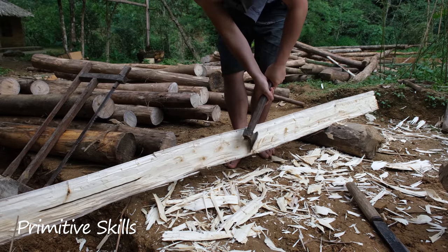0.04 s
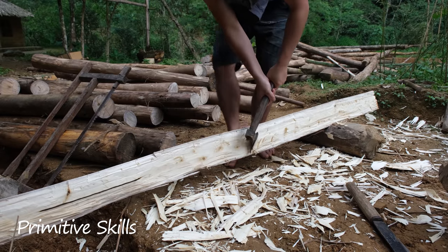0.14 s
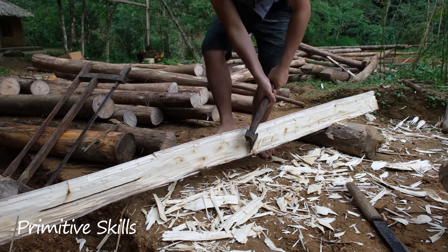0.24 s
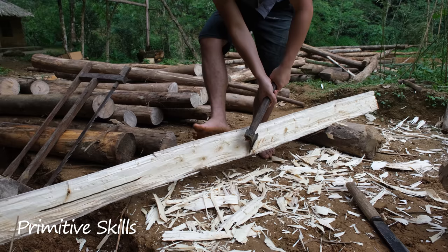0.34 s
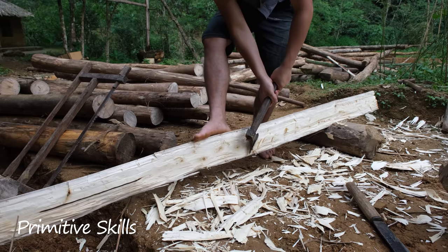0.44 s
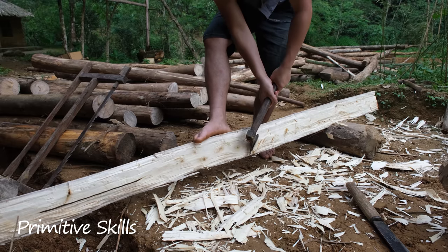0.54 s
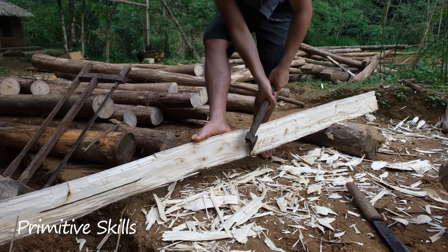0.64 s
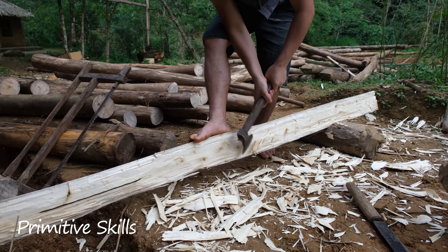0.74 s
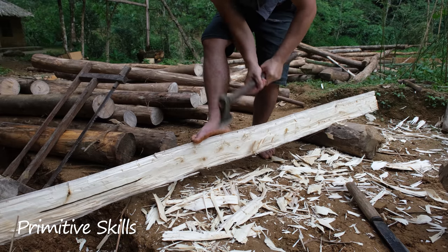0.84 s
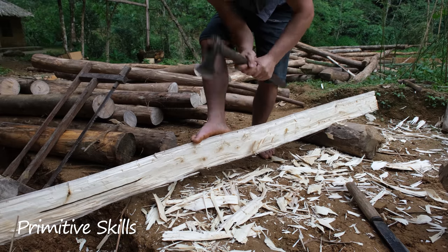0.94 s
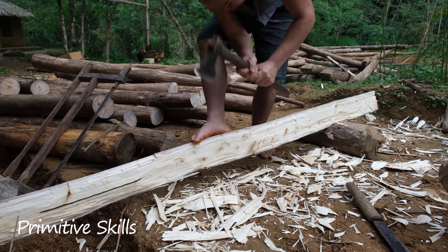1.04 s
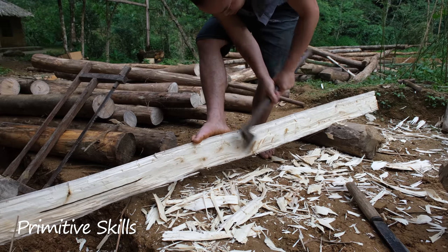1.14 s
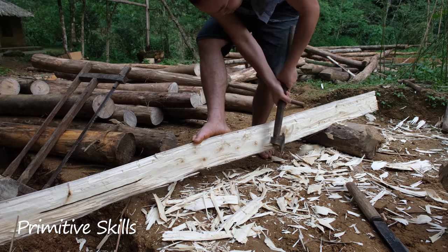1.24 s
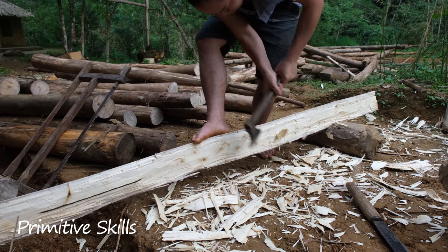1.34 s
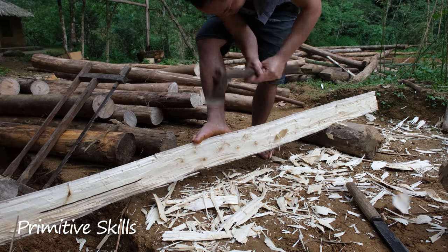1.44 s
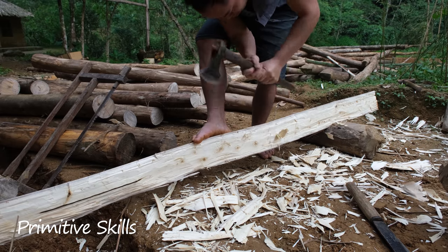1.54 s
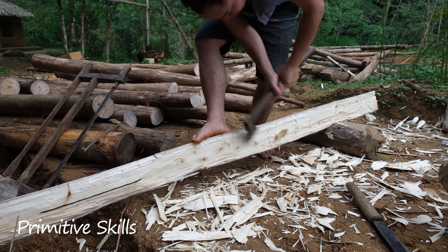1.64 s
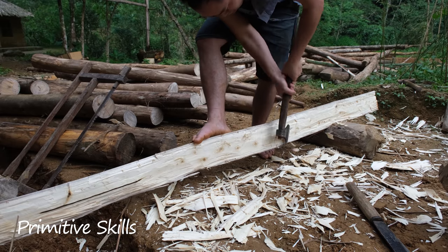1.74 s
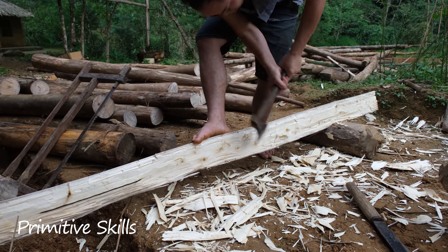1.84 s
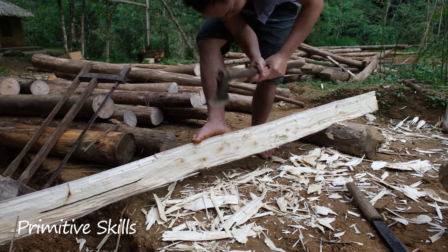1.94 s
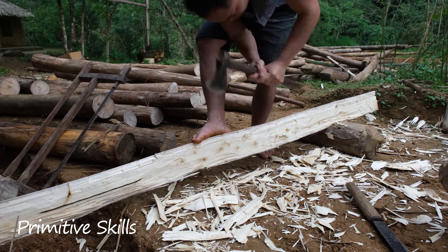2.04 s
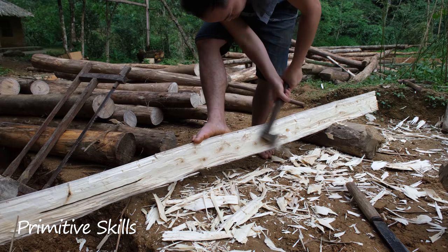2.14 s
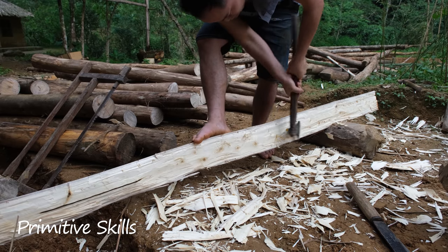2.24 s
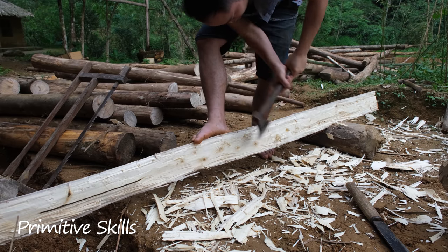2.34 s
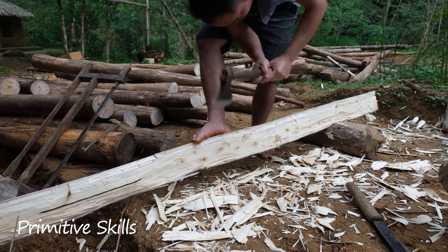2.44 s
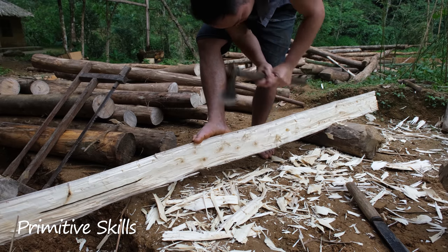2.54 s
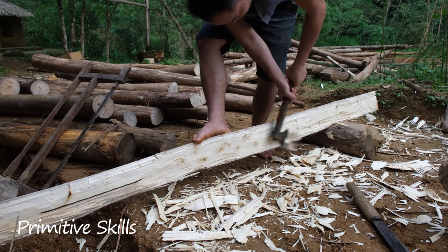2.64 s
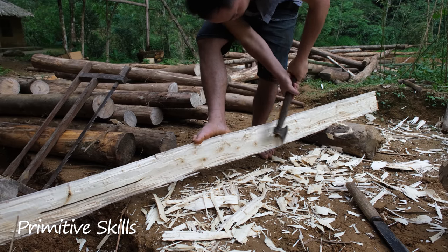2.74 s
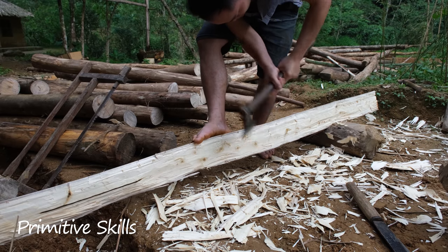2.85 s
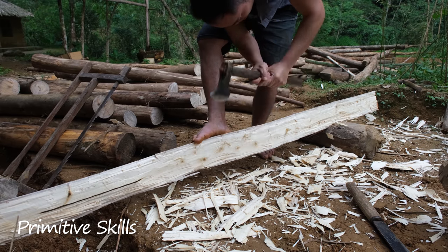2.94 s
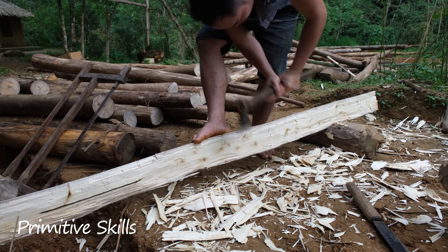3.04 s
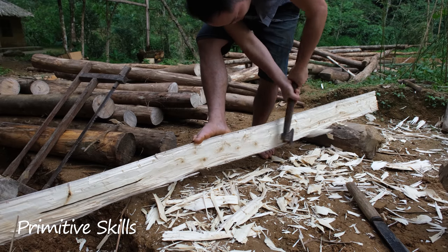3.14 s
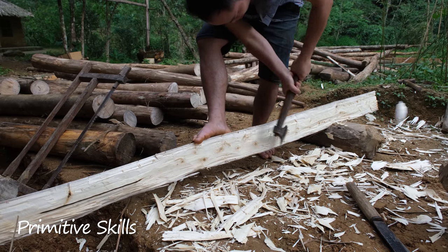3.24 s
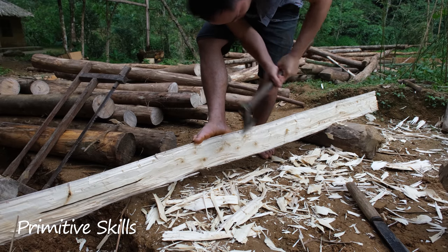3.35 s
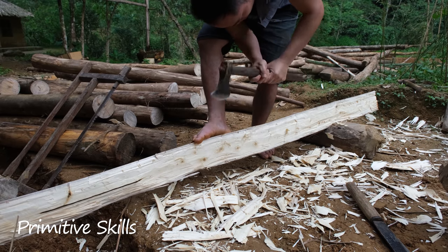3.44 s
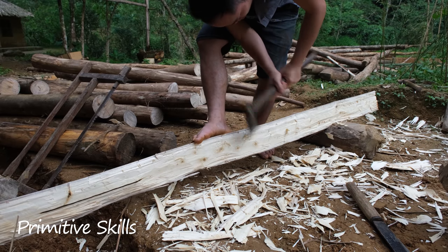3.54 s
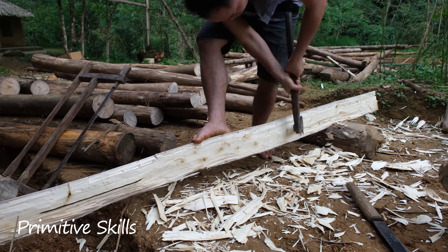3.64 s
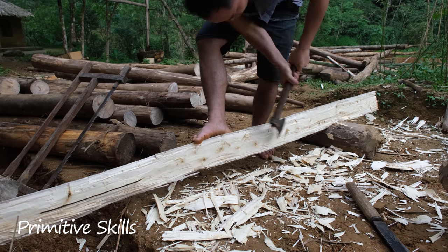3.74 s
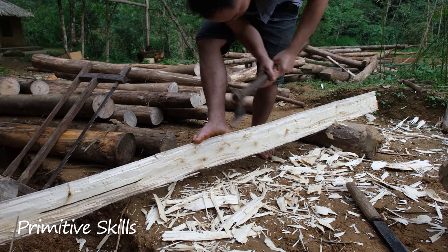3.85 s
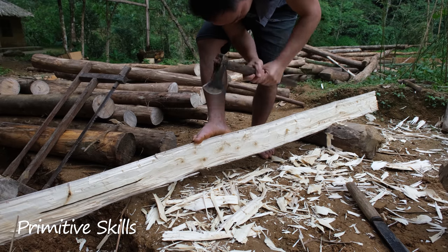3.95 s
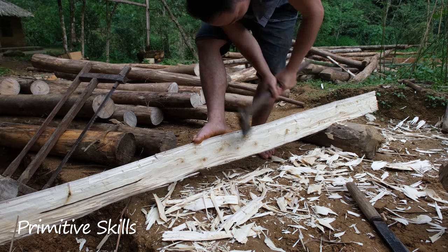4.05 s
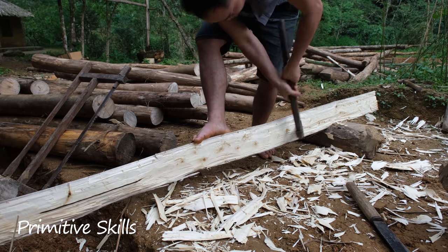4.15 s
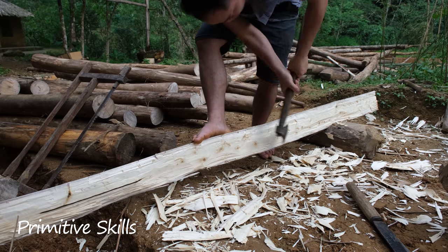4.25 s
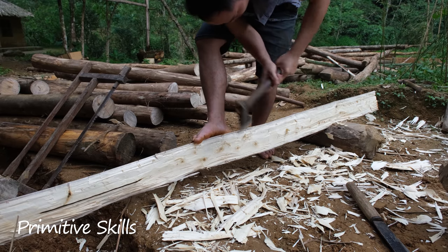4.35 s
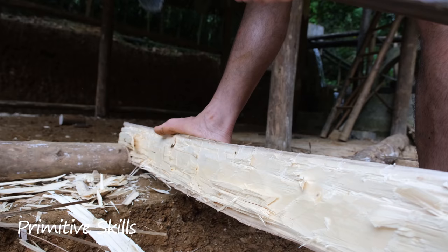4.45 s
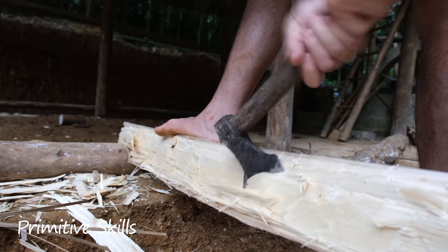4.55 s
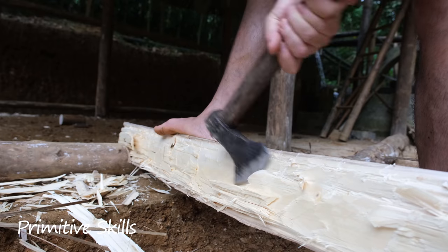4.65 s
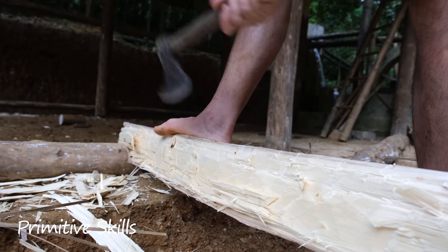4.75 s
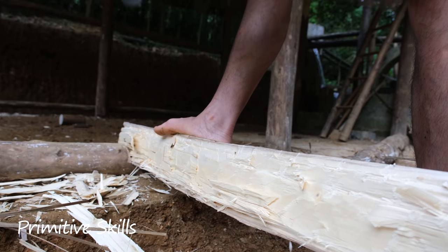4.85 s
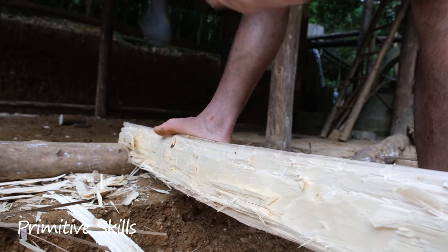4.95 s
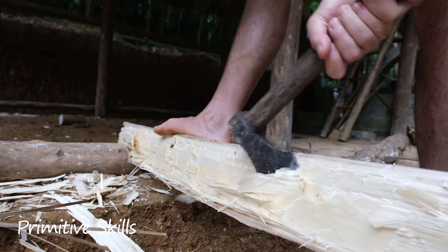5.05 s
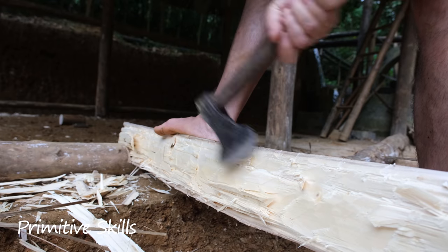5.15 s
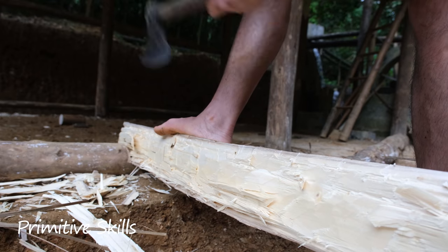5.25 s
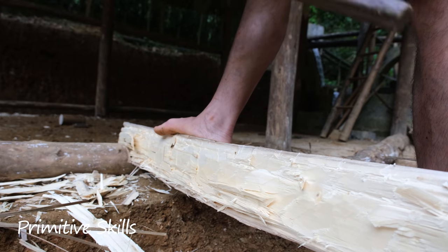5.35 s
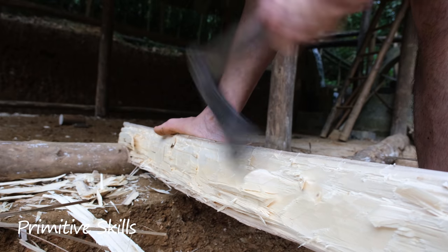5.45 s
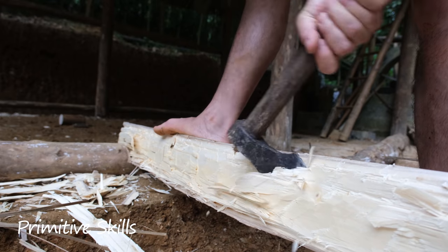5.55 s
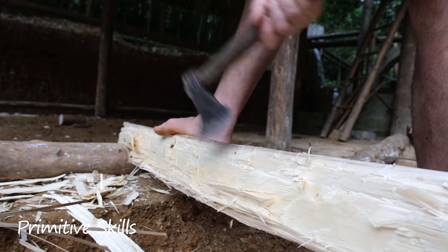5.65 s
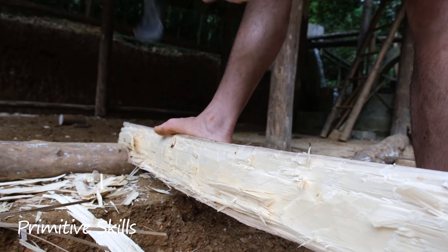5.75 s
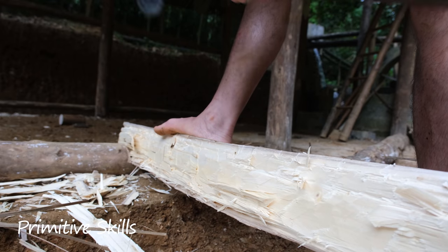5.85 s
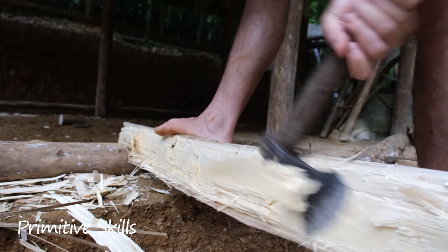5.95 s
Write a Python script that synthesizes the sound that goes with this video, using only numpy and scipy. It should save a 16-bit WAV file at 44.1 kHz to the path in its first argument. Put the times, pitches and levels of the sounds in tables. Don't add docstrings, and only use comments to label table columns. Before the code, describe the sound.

Steady axe work outdoors, nearly dry with a short dull scatter of echoes. Each blow is a brief hard crack, a short log ring and crackling fibres, about half a second apart. Water hiss swells back between strokes, with faint ground rumble and one distant bird peep. After seven blows the perspective cuts close: four harsher, distorted, splintery bites.

```python
import sys
import numpy as np
from scipy import signal
from scipy.io import wavfile

SR = 44100
rng = np.random.default_rng(int(sys.argv[2]) if len(sys.argv) > 2 else 0)


def bounce(signal):
    frames = np.transpose(np.atleast_2d(signal))
    limited = np.clip(frames, -1, 1)
    pcm = np.round(limited * 32767).astype(np.int16)
    wavfile.write(sys.argv[1], SR, pcm)


def voltage_ratio(decibels):
    exponent = np.asarray(decibels, float) / 20
    return 10 ** exponent


N = 265041
SCENE_CHANGE_S = 4.515


def at_hz(points, hz):
    points = np.array(points)
    return np.interp(np.log(hz), np.log(points[:, 0]), points[:, 1])


def band(x, low_hz, high_hz):
    return signal.sosfilt(signal.butter(2, [low_hz, min(high_hz, .45 * SR)], "band", fs=SR, output="sos"), x)


def drift(rate_hz):
    r = np.exp(-80 * np.pi * rate_hz / SR)
    slow = signal.lfilter([1], [1, -2 * r, r * r], rng.standard_normal(N // 40 + 2002))[2000:]
    return np.interp(np.arange(N) / 40, np.arange(len(slow)), slow / slow.std())


def ring(clicks, hz, t60):
    r = voltage_ratio(-60 / (t60 * SR))
    w = 2 * np.pi * hz / SR
    return signal.lfilter([0, np.sin(w)], [1, -2 * r * np.cos(w), r * r], clicks + 1e-18)


def clicks_at(seconds, heights):
    out = np.zeros(N)
    places = np.round(np.asarray(seconds) * SR).astype(int)
    np.add.at(out, np.clip(places, 0, N - 1), heights)
    return out


def contact(s, length_s, release_t60):
    start = round(s * SR)
    t = np.arange(min(round(.25 * SR), N - start)) / SR
    shape = np.minimum(t / 0.00055, 1) * voltage_ratio(-60 * np.maximum(t - length_s, 0) / release_t60)
    return slice(start, start + len(t)), t, shape


def swells(rows, width_s):
    s, level_db = np.transpose(rows)[:, :, None]
    t = np.arange(N) / SR
    return np.sum(voltage_ratio(level_db) * np.exp(-.5 * ((t - s) / width_s) ** 2), axis=0)


# f/Hz, level/dB per Hz
WATER_FAR_SPECTRUM = [(47, -31), (80, -34), (152, -4), (203, -12.5), (276, -5.5), (377, -18), (421, -5.5),
                      (574, -6), (613, -13), (685, -4.5), (873, 1), (1190, -8.5), (4110, -15.5),
                      (15900, -44.5)]
WATER_NEAR_SPECTRUM = [(53, -47), (90, -24), (158, 3), (244, -11), (427, 1.5), (456, -10.5), (566, -1),
                       (750, -6), (873, -0.5), (1380, -7.5), (3410, -11), (15900, -36.5)]


def water(spectrum, patchy_db):
    edges = 40 * 2 ** np.arange(0, 8.9, 1 / 3)
    white = rng.standard_normal((2, N))
    out = 0
    for k, (low, high) in enumerate(zip(edges, edges[1:])):
        gain = voltage_ratio(at_hz(spectrum, np.sqrt(low * high)) + patchy_db * drift(4.3))
        out = out + gain * band(white[k % 2], low, high)
    return out / out.std()


def water_hiss():
    near = np.arange(N) / SR >= SCENE_CHANGE_S
    far_water = water(WATER_FAR_SPECTRUM, patchy_db=.8)
    near_water = water(WATER_NEAR_SPECTRUM, patchy_db=.6)
    between = swells([(b[0] + 0.24, 0) for b in BLOWS], width_s=0.12)
    level_db = np.where(near, -39.5, -44.5) + 2 * between
    return voltage_ratio(level_db) * np.where(near, near_water, far_water)


# f/Hz, level/dB, t60/s
STAND_MODES = [(66.9, -28, 0.59), (25, -22, 0.34)]
# t/s, level/dB
STEPS_UNDERFOOT = [(0.0, -71), (.58, -74), (1.35, -72), (1.92, -65), (2.22, -63), (2.75, -62), (3.15, -66),
                   (3.95, -81)]


def shake():
    rumble = band(band(rng.standard_normal(N), 29.5, 83), 23, 104)
    jolts = clicks_at([b[0] + 0.0086 for b in BLOWS if b[0] > SCENE_CHANGE_S], 0.92)
    stand = sum(voltage_ratio(level_db) * ring(jolts, hz, t60) for hz, level_db, t60 in STAND_MODES)
    steady = voltage_ratio(np.where(np.arange(N) < SCENE_CHANGE_S * SR, -73, -58))
    return (steady + swells(STEPS_UNDERFOOT, width_s=0.088)) * rumble / rumble.std() + stand


# f/Hz, level/dB, t60/s
LOG_MODES_FAR = [(220.5, -20, 0.33), (388.5, -11, 0.25), (480.7, 5, 0.22), (622, 4.5, 0.15),
                 (828.5, 16.5, 0.035), (1110, -10, 0.23), (1240, -29, 0.4)]
LOG_MODES_NEAR = [(346, 5.5, 0.13), (471, 7, 0.14), (606, -5, 0.057), (804, -18, 0.044), (830, -5, 0.092),
                  (1100, -31, 0.057), (1280, 3, 0.052), (1650, -67, 0.05), (1960, -11, 0.018)]
# t/s, ring level/dB, favoured f/Hz, dry thud level/dB
SOFT_KNOCKS = [(0.0, -37, 450, -36), (.528, -40.5, 505, -43), (.54, -43, 490, -43), (1.228, -11.5, 680, 3),
               (1.391, -45, 1160, -19.5), (1.4, -49, 980, -33), (1.693, -39, 920, -15.5),
               (2.218, -6, 546, 2.5), (2.664, -48, 900, -37), (3.611, -37, 1110, -14), (3.638, -9, 494, 2),
               (3.644, -7.5, 750, 2.5), (3.653, -19, 494, 11), (3.662, -12, 795, 8.5),
               (3.673, -9.5, 704, 9), (3.678, -37, 805, -26), (3.69, -30, 706, -20),
               (4.145, -21.5, 452, -11), (4.155, -52, 450, 4), (4.169, -23, 606, -0.5),
               (4.494, -42, 880, -28), (5.082, -37, 900, -18)]


def log():
    seconds = np.array([b[0] + b[3] / 2 for b in BLOWS] + [k[0] for k in SOFT_KNOCKS])
    levels_db = np.array([b[0] for b in LANDING_SPOTS] + [k[1] for k in SOFT_KNOCKS])
    _, below_db, above_db, *_ = np.transpose(LANDING_SPOTS)
    knock_hz = np.array(SOFT_KNOCKS)[:, 2]
    far = (LOG_MODES_FAR, 480, seconds < SCENE_CHANGE_S)      # modes, main ring in Hz, which strikes
    near = (LOG_MODES_NEAR, 842, seconds > SCENE_CHANGE_S)
    out = np.zeros(N)
    for modes, main_hz, heard in (far, near):
        spread = rng.standard_normal((len(seconds), len(modes), 2))
        for k, (hz, level_db, t60) in enumerate(modes):
            landing_db = below_db * (hz < .9 * main_hz) + above_db * (hz > 1.1 * main_hz)
            favour_db = np.r_[landing_db, -55 * np.log2(hz / knock_hz) ** 2]
            chance_db = 1.5 * spread[:, k, 0]
            strike = voltage_ratio(levels_db + level_db + favour_db + chance_db) * np.sign(spread[:, k, 1])
            out += ring(clicks_at(seconds, heard * strike), hz, t60)
    return band(out, 144, 2350)


def thuds():
    out, noise = np.zeros(N), rng.standard_normal(N)
    for s, _, hz, thud_db in SOFT_KNOCKS:
        span, t, shape = contact(s, 0.0035, release_t60=0.048)
        out[span] += voltage_ratio(thud_db) * band(shape * noise[span], hz / 1.73, hz * 1.42)
    return out


# t/s, level/dB
SWING_RUSTLES = [
    (.52, -52),
    (1.1, -58),
    (1.5, -53.5),
    (1.95, -53),
    (3.0, -51),
    (3.4, -57),
    (4.0, -72),
    (4.8, -69),
    (5.35, -45.5),
    (5.9, -44),
]


def rustle():
    t, white = np.arange(N) / SR, rng.standard_normal((2, N))
    leaves = band(white[0], 1400, 4750)
    insects = band(white[1], 6250, 6800)
    chorus = np.clip((t - 3.1) / .35, 0, 1) * (t < SCENE_CHANGE_S)
    leaf_gain = swells(SWING_RUSTLES, width_s=0.12) * voltage_ratio(1.5 * drift(27))
    insect_gain = voltage_ratio(-79) + voltage_ratio(-70) * chorus
    return leaf_gain * leaves / leaves.std() + insect_gain * insects / insects.std()


# t/s, level/dB, centre f/Hz
CHIP_TICKS = [(1.2065, -15, 2490), (1.222, -21, 5000), (1.232, -12.5, 2980), (1.243, -29, 4940),
              (1.255, -29, 6290), (1.393, -37, 2500), (1.447, -50, 7000), (1.531, -48.5, 8000),
              (1.733, -15, 3200), (1.738, -26, 5000), (1.744, -11, 3570), (1.744, -27, 10000),
              (1.762, -40, 8000), (2.205, -18, 5940), (2.228, -25, 3500), (2.775, -45, 8000),
              (3.351, -52, 4960), (3.613, -36, 2000), (3.644, -9.5, 2860), (3.663, -20, 2930),
              (3.673, -28, 2920), (3.703, -37, 5000), (4.173, -33, 3970), (4.193, -35, 3950),
              (4.312, -50, 5090), (5.106, -26.5, 4940), (5.63, -45, 10000), (5.695, -35, 4500)]


def chips():
    out, noise = np.zeros(N), rng.standard_normal(N)
    for s, level_db, hz in CHIP_TICKS:
        span, t, shape = contact(s, 0.00056, release_t60=0.023)
        snap = shape * noise[span]
        puff = band(snap, hz / 2.0, hz * 1.36)
        out[span] += voltage_ratio(level_db + 8.0) * (puff + voltage_ratio(-38.5) * ring(snap, hz, t60=0.0062))
    return out


# t/s, bite level/dB, bite f/Hz, bite length/s, tearing level/dB
BLOWS = [(1.2080, 13, 612, 0.00312, -4), (1.7061, 13, 603, 0.0041, 0.5), (2.1875, 16, 670, 0.0066, 0),
         (2.673, 4.5, 707, 0.0084, 3), (3.1407, 7.5, 776, 0.0073, -1), (3.6242, 8.5, 703, 0.0038, -3.5),
         (4.1228, 11.5, 620, 0.0066, -5), (4.5876, 19.5, 885, 0.00585, 0),
         (5.0492, 22, 890.4, 0.0073, 10.5), (5.5125, 18.5, 875.6, 0.0051, 12),
         (5.9793, 19.5, 870, 0.0074, 11)]
# main ring level/dB, modes below it level/dB, modes above it level/dB, overtone level/dB, shove level/dB
LANDING_SPOTS = [(-6, -14, -11.5, -1, -18), (-13.5, -2, -2.5, -9.5, -24), (-11, 1, -3, 0, -13),
                 (-17, -2, 6.5, -12, -19), (-15.5, -1, -6.5, -13.5, -28), (-13.5, 10.5, 0, -10.5, -39),
                 (-15, 1, 1, -3, -26), (-18, 0.5, 6, -28, -30), (-12, -4, 5, -11.5, -5.5),
                 (-12, -3.5, 2, -7, -7.5), (-5, -8, 10.5, -5.5, -18)]


def bites(wobble, glide, grind_db):
    out, push = np.zeros(N), np.zeros(N)
    unsteady = band(rng.standard_normal(N), 165, 1180)
    grind = band(rng.standard_normal(N), 625, 1710)
    for (s, bite_db, hz, length_s, _), (*_, over_db, push_db) in zip(BLOWS, LANDING_SPOTS):
        near = s > SCENE_CHANGE_S
        span, t, shape = contact(s, length_s, release_t60=0.0092 if near else 0.008)
        build = np.minimum(t / (0.42 * length_s), 1)
        rough = build * shape * (.3 if near else 1)
        rise = (0.077 if near else glide) * (np.minimum(t / length_s, 1.5) - .5)
        pitch_hz = hz * (1 + rise + rough * wobble * unsteady[span] / unsteady.std())
        main = np.sin(2 * np.pi * np.cumsum(pitch_hz) / SR + 1.864)
        over = voltage_ratio(over_db) * np.sin(2 * np.pi * (1345 if near else 1112.6) * t + 1.3)
        grinding = rough * voltage_ratio(grind_db) * grind[span] / grind.std()
        out[span] -= voltage_ratio(bite_db - 1000 * t) * shape * (main + over + grinding)
        after_db = bite_db - 25 - 60 * np.maximum(t - length_s, 0) / 0.032
        out[span] -= near * voltage_ratio(after_db) * build * main
        push[span] += voltage_ratio(push_db) * shape
    return band(out, 271, 10700) + band(push, 20.0, 490)


def tearing(grains_per_s, crackle_db, crackle_t60):
    noise, out = rng.standard_normal(N), np.zeros(N)
    snaps = rng.random(N) < grains_per_s / SR
    grains = snaps * voltage_ratio(4.5 * np.minimum(rng.exponential(1, N), 4)) * rng.choice([-1, 1], N)
    for s, _, _, length_s, tear_db in BLOWS:
        span, t, shape = contact(s, length_s, release_t60=0.0084)
        build = np.minimum(t / (0.61 * length_s), 1)
        thin_db = 15 if s > SCENE_CHANGE_S else 0
        after_db = crackle_db - 60 * t / crackle_t60 - thin_db
        crackle = voltage_ratio(after_db) * (grains[span] + 0.26 * noise[span])
        out[span] += voltage_ratio(tear_db) * build * (shape * noise[span] + crackle)
    return band(out, 1060, 5500) + voltage_ratio(-14.5) * band(out, 5000, 14300)


def clearing(x, wet_db, t60):
    t = np.arange(round(.4 * SR)) / SR
    scatter = band(rng.standard_normal(len(t)), 100, 1950) * voltage_ratio(-60 * t / t60) * (t > .008)
    scatter = scatter / np.sqrt(np.sum(scatter ** 2))
    return x + voltage_ratio(wet_db) * signal.fftconvolve(x, scatter)[:N]


def bird():
    out = np.zeros(N)
    span, t, shape = contact(1.972, .02, release_t60=0.16)
    out[span] = voltage_ratio(-29.5) * np.minimum(t / .008, 1) * shape
    return out * band(rng.standard_normal(N), 3030, 3500)


def scene():
    blade = bites(wobble=0.44, glide=0.22, grind_db=-8.0)
    blade = blade + tearing(grains_per_s=1600, crackle_db=-1.0, crackle_t60=0.093)
    axe = blade + log() + thuds() + chips()
    background = water_hiss() + voltage_ratio(0.5) * shake() + bird() + rustle()
    return (clearing(axe, wet_db=-27.5, t60=0.14) + background)[None]


def gain_control(x, knee_db, slope, release_s, attack_s):
    over = np.maximum(20 * np.log10(np.abs(x) + 1e-9) - knee_db, 1e-3) * slope
    ramp = np.arange(N) / SR / release_s
    held = np.exp(np.maximum.accumulate(np.log(over) + ramp, axis=-1) - ramp)
    r = np.exp(-1 / (attack_s * SR))
    return -signal.lfilter([1 - r], [1, -r], held)


def low_pass(x):
    return signal.sosfilt(signal.butter(12, 16010, fs=SR, output="sos"), x)


def record(dry):
    hiss_db = np.where(np.arange(N) < SCENE_CHANGE_S * SR, -67, -60)
    heard = dry + voltage_ratio(hiss_db) * band(rng.standard_normal(dry.shape), 9000, 15000)
    gain_db = gain_control(np.clip(heard, -1, 1), knee_db=-29.0, slope=0.58, release_s=0.13, attack_s=0.014)
    overloaded = np.clip(heard * voltage_ratio(gain_db), -.985, .985)
    top_cut = signal.cheby2(12, 55, 16300, fs=SR, output="sos")
    return low_pass(signal.sosfilt(top_cut, overloaded))


dry = scene()
out = record(dry)
bounce(out)
```